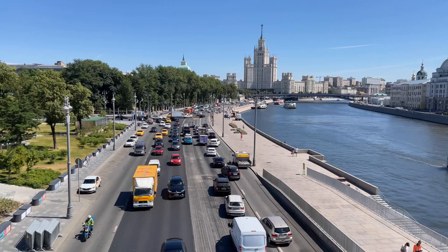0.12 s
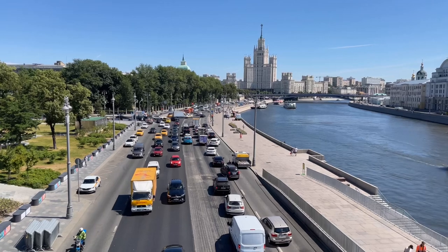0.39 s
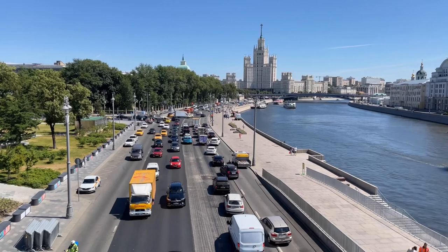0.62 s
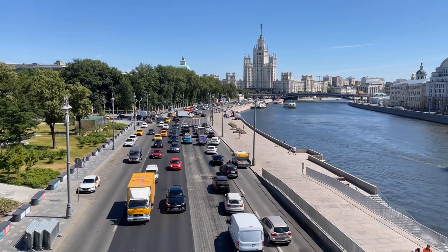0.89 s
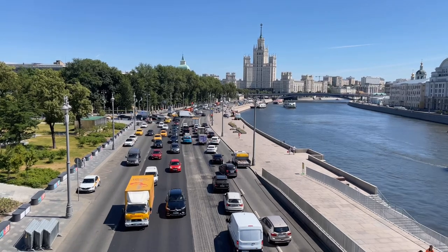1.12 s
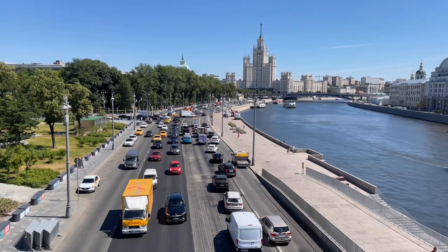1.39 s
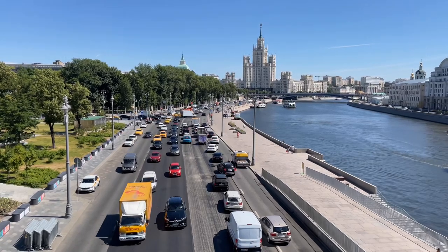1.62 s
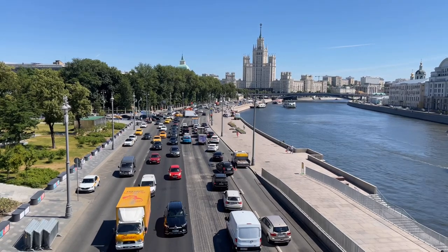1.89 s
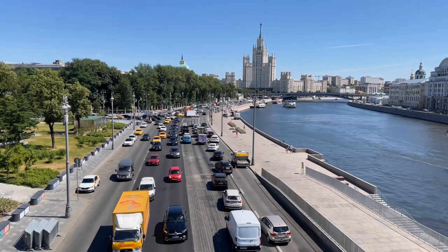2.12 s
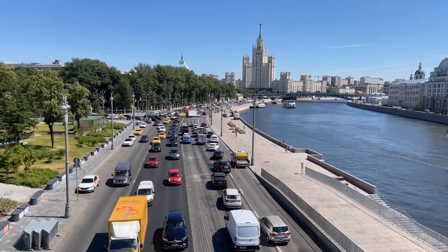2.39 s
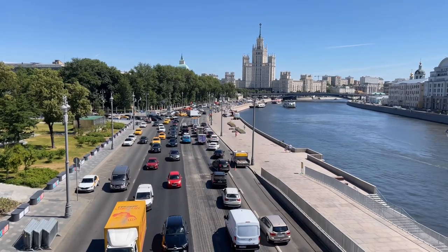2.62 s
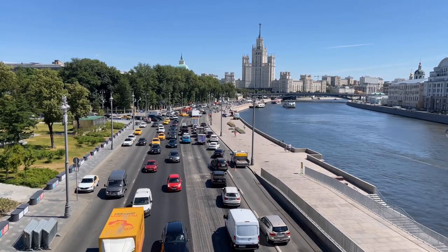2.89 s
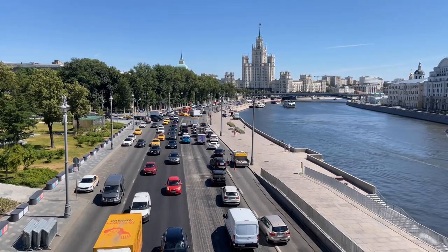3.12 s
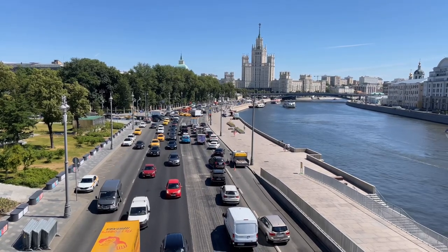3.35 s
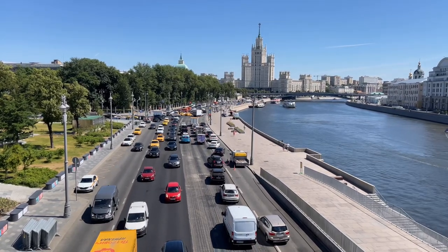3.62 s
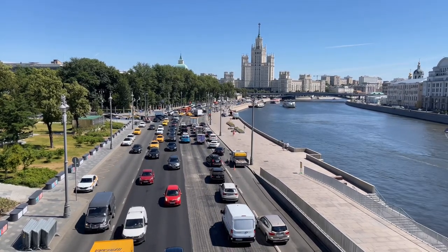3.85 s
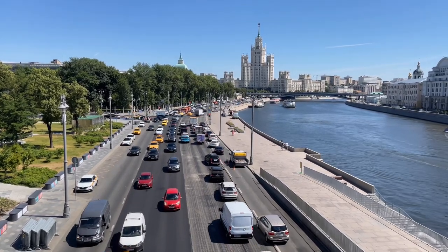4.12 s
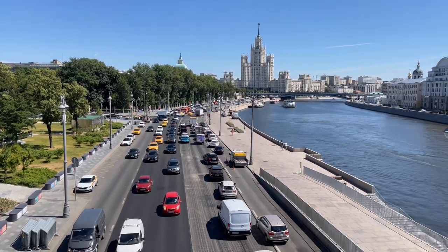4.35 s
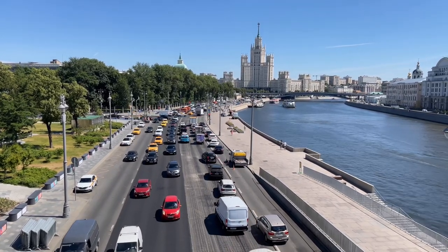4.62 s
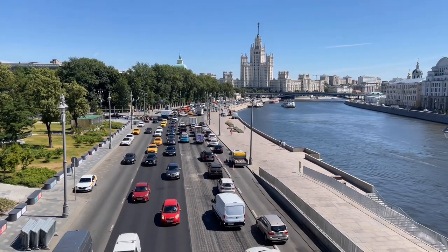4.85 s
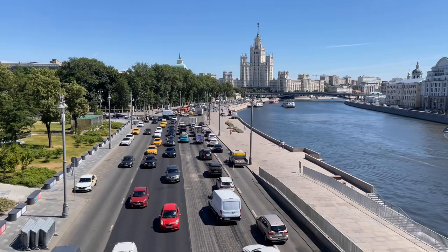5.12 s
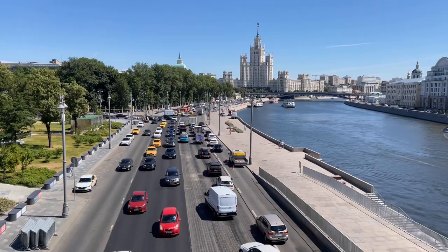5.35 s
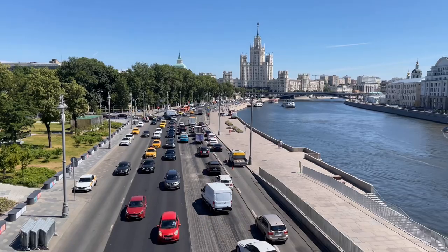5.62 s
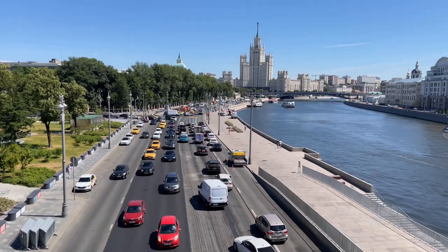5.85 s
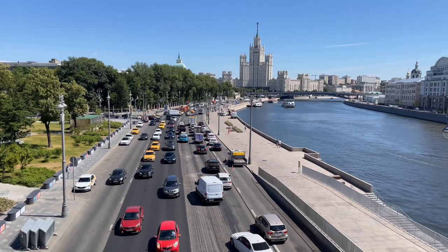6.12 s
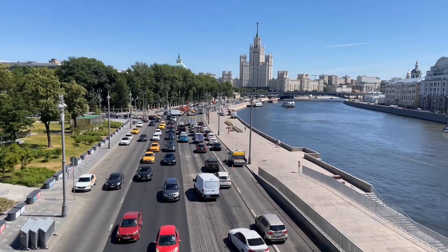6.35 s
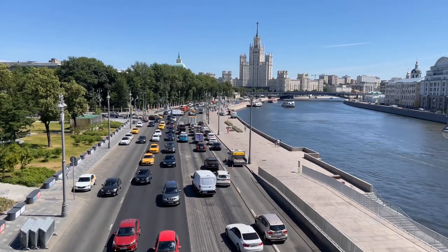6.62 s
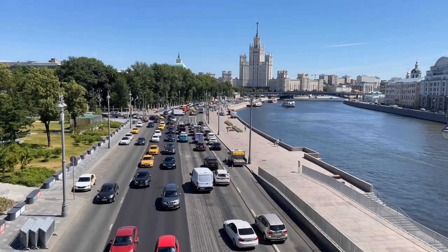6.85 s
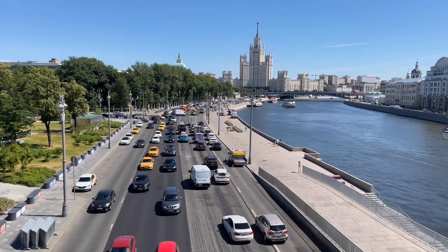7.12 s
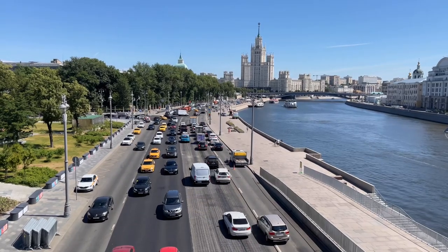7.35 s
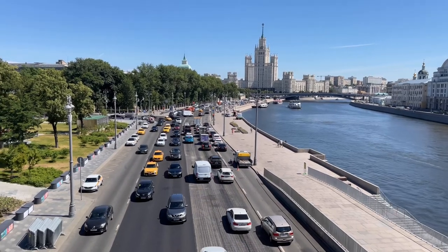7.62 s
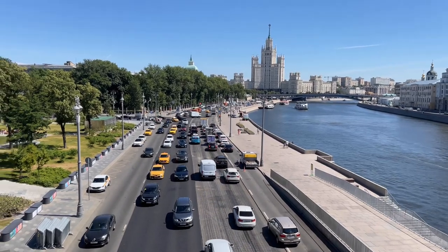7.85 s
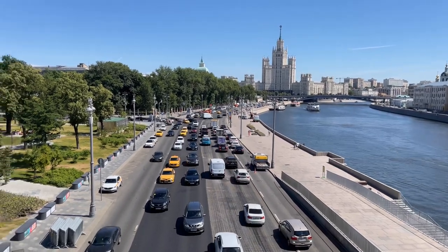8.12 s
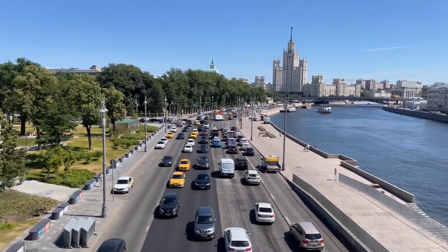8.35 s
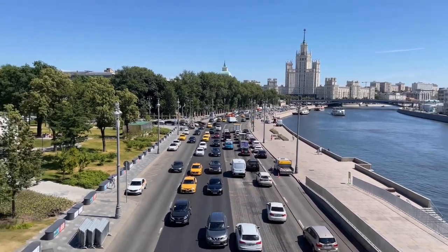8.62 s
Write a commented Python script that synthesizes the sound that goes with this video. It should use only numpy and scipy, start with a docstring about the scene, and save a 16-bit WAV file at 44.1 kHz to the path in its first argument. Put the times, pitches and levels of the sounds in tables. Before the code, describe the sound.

Dense slow traffic rumbles and hisses continuously beneath a high viewpoint, a lorry droning past early, engines revving and sagging, with small handling ticks near the end.

```python
"""Dense slow traffic on a wide road, heard from a footbridge above it on a hand-held two-port microphone. Bands
of noise make its rumble, tyre roar and hiss, rising and falling with the flow of vehicles. Gliding tone stacks
make a lorry that drones steadily and lifts off, and engines that rev up and drop. Thin gliding tones make brake
squeaks and bird chirps, shaped noise makes short hisses from the road, and bursts ringing through resonances
make the handset tick in the fingers."""
import sys
import numpy as np
from scipy import signal
from scipy.fft import rfft, irfft, next_fast_len
from scipy.io import wavfile
from scipy.ndimage import map_coordinates

SR = 44100
rng = np.random.default_rng(int(sys.argv[2]) if len(sys.argv) > 2 else 0)


def ratio_of_db(decibels):
    """Turn decibels (scalar or array-like) into linear amplitude factors; 0 dB maps to 1."""
    return 10 ** (np.asarray(decibels, float) / 20)


def transcribe(u):
    """Save the signal u as a 16-bit wav file named by the first command-line argument.

    u: samples, shape (n,) or (channels, n), limited to [-1, 1]; the rate is SR.
    q: integer samples, one column per channel.
    """
    v = np.clip(np.atleast_2d(u).T, -1, 1)
    q = np.round(v * 32767).astype(np.int16)
    wavfile.write(sys.argv[1], SR, q)


N = 385434

# the colour of road noise: frequency_hz, relative density_db [dB per Hz]
ROAD_SPECTRUM = [(150, -1), (300, -8), (500, -12), (750, -15), (1000, -16.5), (1300, -21), (1800, -24),
                 (2500, -27.5), (3200, -29), (3800, -33.5), (5200, -36.5), (5700, -39.5), (6400, -37.5),
                 (9000, -38.5), (12000, -45), (14500, -44)]
# the finished stereo image; near 9 kHz left and right are nearly opposite, at the very top they are the same:
# frequency_hz, left-right likeness [0-1], left minus right balance_db, left_lead_rad
STEREO_IMAGE = [(60, .98, .5, .02), (150, .98, .9, .06), (300, .87, .7, .17), (500, .64, 1.6, .45),
                (800, .49, 2.4, .55), (1200, .66, 3, .57), (1800, .69, 1.7, .86), (2500, .6, 2.8, 1.6),
                (3200, .54, 6.1, 1.86), (3800, .26, 7.8, 1.3), (4400, .5, 5.9, .3), (5000, .49, 4.9, .45),
                (5600, .39, 2.2, -.8), (6400, .52, 1.5, -1), (7400, .55, .9, -2.6), (8200, .97, 0, -3.14),
                (9600, .97, 0, -3.14), (10400, .5, 0, -4.2), (11600, .7, 0, -5.9), (11900, 1, 0, -6.28)]


def unit(x):
    """Scaled to rms 1."""
    return x / np.sqrt(np.mean(x ** 2) + 1e-20)


def along(hz_points, values, hz):
    """Values joined on a log frequency axis."""
    return np.interp(np.log(hz + 1), np.log(np.asarray(hz_points) + 1), values)


def curves(rows):
    """One value per sample for each column after the time."""
    s, *cols = np.transpose(rows)
    return [np.interp(np.arange(N) / SR, s, c) for c in cols]


def wobble(rate, size=N):
    """A smooth random curve, rate knots a second."""
    knots = rng.standard_normal(int(size * rate / SR) + 4)
    return map_coordinates(knots, [np.arange(size) * rate / SR])


def filtered(x, response):
    """x times a complex response of frequency."""
    m = next_fast_len(x.shape[-1] + 8192)
    spectrum = rfft(x, m) * response(np.fft.rfftfreq(m, 1 / SR))
    return irfft(spectrum, m)[..., :x.shape[-1]]


def traffic():
    """Many engines and tyres merge into noise that follows the flow and swells with the lorry."""
    # how thick the nearby traffic is: time_s, flow_db over its usual level, treble_db likewise
    flow_rows = [(0, 0, -1), (.55, -2, -1), (2.8, -2, -2.5), (4.5, -0.5, -0.5), (5, .5, 0), (5.7, 1, 1.5),
                 (6.6, 0.5, -1), (7.6, -1, -3), (8.74, -2.5, -5)]
    # the colour of massed exhausts: frequency_hz, relative density_db [dB per Hz]
    rumble_spectrum = [(30, -14), (45, -1.5), (75, 0), (100, -4), (130, -7.5), (160, -11), (220, -17),
                       (300, -21.5)]
    flow_db, treble_db = curves(flow_rows)
    t = np.arange(N) / SR
    near = nearness(t)

    # a van's hiss grows in the treble until the bridge deck hides it
    van_under_s, van_rise_s, van_peak_db = 3.02, 0.8, 4
    approach = np.exp(-np.maximum(van_under_s - t, 0) / van_rise_s)
    still_open = np.clip((van_under_s + 0.1 - t) / 0.1, 0, 1)
    van_db = van_peak_db * approach * still_open

    def level(db, swing, lorry_db, follows=flow_db):
        return ratio_of_db(db + swing * follows + lorry_db * near)

    # the treble flutters, the air most
    flutter = wobble(9)
    tread_flutter = ratio_of_db(0.5 * flutter + 0.46 * wobble(4.34))
    air_flutter = ratio_of_db(van_db + 1.0 * flutter + 1.1 * wobble(25))

    rumble = level(db=-31.5, swing=0.53, lorry_db=5.5) * rush(rumble_spectrum, 5, 230)
    drone = level(db=-35.5, swing=1.13, lorry_db=4.5) * rush(ROAD_SPECTRUM, 224, 754)
    roar = level(db=-38, swing=0.59, lorry_db=1.5) * rush(ROAD_SPECTRUM, 780, 2020)
    tread = level(db=-48.5, swing=1, lorry_db=6.0, follows=treble_db) * rush(ROAD_SPECTRUM, 2710, 5280)
    air = level(db=-63.5, swing=1.2, lorry_db=11, follows=treble_db) * rush(ROAD_SPECTRUM, 11000, 30000)
    return rumble + drone + roar + tread * tread_flutter + air * air_flutter


def rush(spectrum, low_hz, high_hz):
    """Noise from many directions, rms 1, one stretch of a spectrum; left and right are partly alike."""
    image_hz, alike = np.transpose(STEREO_IMAGE)[:2]

    def mid_and_side(hz):
        band = 1 / np.sqrt((1 + (low_hz / (hz + 1)) ** 4) * (1 + (hz / high_hz) ** 4))
        colour = ratio_of_db(along(*np.transpose(spectrum), hz)) * band
        # the angle shares the power between mid and side
        angle = np.arccos(np.clip(along(image_hz, alike, hz), 0, 1)) / 2
        return colour * [np.cos(angle), np.sin(angle)]

    mid, side = filtered(rng.standard_normal((2, N)), mid_and_side)
    return unit(np.array([mid + side, mid - side]))


def nearness(t):
    """1 when the lorry is nearest, falling off smoothly before and after."""
    pass_s, half_nearness_s = 1.58, 0.78
    return 1 / (1 + ((t - pass_s) / half_nearness_s) ** 2)


def engines():
    """The engines that stand out of the mass, each in its own lane, a little left or right."""
    # exhaust notes that glide under load, then sag off the throttle:
    # start_s, lift_s, end_s, first_hz, lift_hz (pitch at the lift), level_db (at the lift)
    rev_rows = [(-.2, .4, .85, 182.2, 178.6, -35.5), (.3, 1.45, 1.49, 123.5, 138.3, -26),
                (0.501, 1.653, 2.95, 67.86, 81.15, -30), (2, 2.4, 2.44, 148.5, 149.6, -31.5),
                (2.502, 2.85, 2.85, 107.8, 102.4, -34.5), (2.85, 3.498, 3.45, 100, 90.7, -31),
                (4.901, 5.848, 6.15, 67.26, 86.97, -29), (5.8, 6.597, 6.94, 60.8, 69.9, -33),
                (5.9, 6.2, 6.2, 52.1, 52.5, -19), (6.848, 7.55, 7.55, 127.1, 126.8, -35.5),
                (8.3, 8.65, 8.65, 118, 125.4, -37.5)]

    def lane(pan_db):
        return ratio_of_db([[pan_db], [-pan_db]])

    revs = sum(rev(*row) * lane(rng.normal(0, 0.4)) for row in rev_rows)
    return lorry() * lane(0.39) + coasting() * lane(-0.27) + revs


def lorry():
    """Steady firing, louder when near; off the throttle it sags and dies."""
    # 1st to 4th multiple of the firing rate: level_db, gain near_db when nearest
    order_rows = [(-36, -3), (-30.5, 7), (-43, 5), (-48, 2)]
    firing_hz, lift_s = 45.18, 1.95
    sag_hz_per_s, fall_db_per_s = 9, 63  # after the lift
    t = np.arange(-0.1, lift_s + 0.5, 1 / SR)
    after = np.maximum(t - lift_s, 0)
    near = nearness(t)
    levels = [db + near_db * near - fall_db_per_s * after for db, near_db in order_rows]
    return engine(t, firing_hz - sag_hz_per_s * after, levels, fade=0.071, rough=0.28)


def rev(start_s, lift_s, end_s, first_hz, lift_hz, level_db):
    """One exhaust note and its octave, growing under load up to the lift, then sagging in pitch."""
    sag_hz_per_s, load_db_per_s = 26, 3.5
    octave_db, octave_top_hz = -11.5, 190  # silencers swallow the octave above octave_top_hz
    t = np.arange(start_s, end_s, 1 / SR)
    glide = np.interp(t, [start_s, lift_s], [first_hz, lift_hz])
    hz = glide - sag_hz_per_s * np.maximum(t - lift_s, 0)
    first = level_db - load_db_per_s * np.maximum(lift_s - t, 0)
    silencer_db = 10 * np.log10(1 + (2 * hz / octave_top_hz) ** 8)
    return engine(t, hz, [first, first + octave_db - silencer_db], fade=0.18, rough=1.07)


def coasting():
    """Two orders of a slowing engine, the second lifted as it crosses the pipe's resonance."""
    # a car rolling on and slowing: time_s, firing_hz, level_db
    coasting_rows = [(3.35, 50.2, -30.5), (4.3, 49, -33.5), (5.2, 46.9, -28.5), (6.1, 45, -32),
                     (6.6, 43.2, -38), (7.6, 40.4, -31.5), (8.74, 37.1, -40.5)]
    second_order_db, pipe_hz, pipe_width_hz, pipe_gain_db = -9, 96.8, 1.6, 6.5
    s, *cols = np.transpose(coasting_rows)
    t = np.arange(s[0], s[-1] + 0.2, 1 / SR)
    hz, db = [np.interp(t, s, c) for c in cols]
    pipe_db = pipe_gain_db / (1 + ((2 * hz - pipe_hz) / pipe_width_hz) ** 2)
    return engine(t, hz, [db, db + second_order_db + pipe_db], fade=0.17, rough=1.0)


def engine(t, hz, levels, fade, rough):
    """Low exhaust orders locked to the firing rate; uneven firing shakes their size and phase."""
    turn = 2 * np.pi * (np.cumsum(hz) / SR + rng.random())

    def shake(rate):
        return rough * wobble(rate, size=len(t))

    note = 0
    for order, db in enumerate(levels, 1):
        note = note + ratio_of_db(db + shake(11)) * np.sin(order * turn + 0.092 * shake(8.8))
    fades = np.clip(np.minimum(t - t[0], t[-1] - t) / fade, 0, 1)  # fade in seconds
    out = np.zeros(N + 2 * SR)  # a spare second at each end
    out[SR + round(t[0] * SR):][:len(t)] = np.sqrt(2) * note * fades
    return out[SR:][:N]


def squeaks():
    """Thin, unsteady, gliding tones from one side of the road: brakes squeal and birds chirp."""
    # thin squeaks and chirps: start_s, end_s, first_hz, last_hz, level_db
    squeak_rows = [(0.234, .256, 6000, 5900, -55), (1.577, 1.78, 9060, 9100, -58),
                   (2.6, 2.962, 9080, 9140, -57), (4.285, 4.31, 6400, 6050, -61),
                   (4.3, 4.34, 6070, 5900, -57), (5.671, 5.754, 2030, 2770, -48),
                   (5.725, 5.77, 2190, 2360, -46), (5.996, 6.083, 2456, 2440, -50),
                   (6.18, 6.219, 2540, 2550, -51)]
    out = np.zeros(N)
    for start, end, first_hz, last_hz, db in squeak_rows:
        size = round((end - start) * SR)
        glide = 2 * np.pi * np.cumsum(np.linspace(first_hz, last_hz, size)) / SR
        turn = glide + (0.5 + first_hz / 7000) * wobble(90, size=size)
        level = ratio_of_db(db + 3.4 * wobble(40, size=size)) * signal.windows.tukey(size, 0.3)
        out[round(start * SR):][:size] += level * np.sin(turn)
    return out * ratio_of_db([[3.1], [-3.1]])  # towards the left


def hisses():
    """Puffs of noise with a quick rise and a slower fall."""
    # short hisses from the road, a row for each band (the last hiss has two):
    # start_s, length_s, centre_hz, width_hz, level_db (before the rise and fall)
    hiss_rows = [(2.802, 0.22, 11800, 4500, -60), (3.08, 0.17, 6840, 1800, -55.5),
                 (3.659, 0.082, 6000, 1600, -49.5), (8.19, .38, 5400, 1900, -53),
                 (8.2, 0.18, 12000, 3500, -63)]
    out = np.zeros((2, N + SR))
    for s, length, hz, width, db in hiss_rows:
        u = np.arange(int(2.5 * length * SR)) / (length * SR)  # time in lengths
        noise = rng.standard_normal(len(u)) + 1.2 * rng.standard_normal((2, len(u)))  # shared + separate
        puff = unit(filtered(noise, lambda f: np.exp(-2 * ((f - hz) / width) ** 2)))
        shape = np.minimum(u / 0.11, 1) * np.exp(-2.1 * u ** 2)
        out[:, round(s * SR):][:, :len(u)] += ratio_of_db(db + 2.7 * wobble(32, size=len(u))) * puff * shape
    return out[:, :N]


def ticks(count):
    """Each tick is a few milliseconds of slip in the grip that rings the handset's shell."""
    # slips of the fingers: time_s, slip_db
    tick_rows = [(7.0169, -40), (7.2374, -36), (7.4459, -35), (7.841, -39), (7.8729, -41), (8.173, -19.5),
                 (8.3673, -28), (8.6412, -43)]
    # resonances of the handset's shell: centre_hz, width_hz, level_db
    shell_rows = [(14400, 900, 3), (12800, 900, -14), (7200, 250, -16), (6100, 250, 0)]
    # fainter ticks come at random once the grip shifts
    fidget_from_s, fidget_db = 5.8, -43
    fidget_span_s = N / SR - fidget_from_s
    faint = [(fidget_from_s + u * fidget_span_s, fidget_db + 4 * (v - 0.5))
             for u, v in rng.random((count, 2))]

    slips, t = np.zeros(N + SR), np.arange(SR // 25) / SR
    # a 1.7 ms rise; the main fall loses 60 dB in 21 ms, a weaker tail in 100 ms
    fall = np.minimum(t / 0.0017, 1) * (ratio_of_db(-60 * t / 0.021) + 0.06 * ratio_of_db(-60 * t / 0.1))
    for s, db in tick_rows + faint:
        slips[round(s * SR):][:len(t)] += ratio_of_db(db) * fall * rng.standard_normal(len(t))

    def shell(f):
        modes = 0
        for k, (c, w, db) in enumerate(shell_rows):
            modes = modes + (-1) ** k * ratio_of_db(db) * 1j * f * w / (c * c - f * f + 1j * f * w)
        return modes * np.sqrt(abs(modes))  # valleys between the modes are deep

    return filtered(slips[:N], shell)


def far_engines(count, low_hz, high_hz, db):
    """Farther engines surface for a moment as faint drifting notes."""
    out = np.zeros(N + 2 * SR)
    for when, pitch, drift, length, size in rng.random((count, 5)):
        hz = low_hz * (high_hz / low_hz) ** pitch
        n = round((0.274 + 0.71 * length) * SR)
        last_hz = hz * (1 + 0.0986 * (drift - 0.5))
        turn = 2 * np.pi * np.cumsum(np.linspace(hz, last_hz, n)) / SR
        level = ratio_of_db(db + along(*np.transpose(ROAD_SPECTRUM), hz) + 5.3 * size)
        out[round(when * N):][:n] += level * np.hanning(n) * np.sin(turn)
    return out[SR // 2:][:N]  # some notes have already begun


def scene():
    """Everything in stereo, before the balance and phase of the image."""
    far = far_engines(count=70, low_hz=60.2, high_hz=1500.5, db=-40)
    return traffic() + engines() + squeaks() + hisses() + ticks(count=7) + far


def roll_off(x):
    """The treble ends steeply here."""
    return signal.sosfilt(signal.butter(12, 15980, fs=SR, output="sos"), x)


def record(dry):
    """Gives left and right the image's balance and phase; the microphone's band is cut steeply at both ends."""
    image_hz, _, balance_db, left_lead_rad = np.transpose(STEREO_IMAGE)
    low_hz, top_hz = 37, 14800  # the microphone's band
    side = np.array([[0.5], [-0.5]])  # half of each difference to either channel

    def response(hz):
        band = 1 / np.sqrt((1 + (low_hz / (hz + 1)) ** 9) * (1 + (hz / top_hz) ** 60))
        balance = ratio_of_db(side * along(image_hz, balance_db, hz))
        phase = np.exp(1j * side * along(image_hz, left_lead_rad, hz))
        return band * balance * phase

    mix = filtered(dry, response)
    return roll_off(mix)


dry = scene()
out = record(dry)
transcribe(out)
```